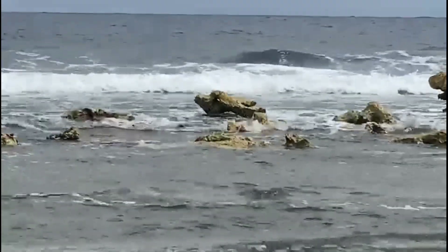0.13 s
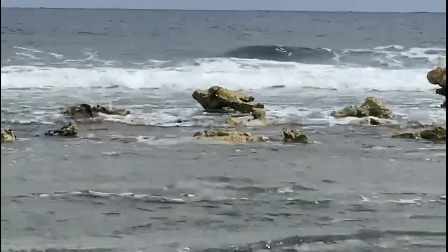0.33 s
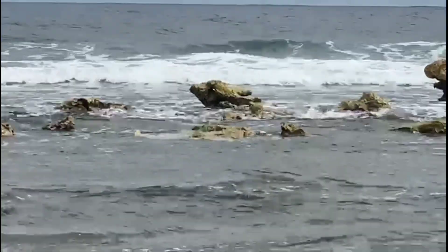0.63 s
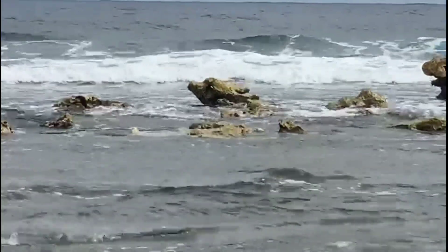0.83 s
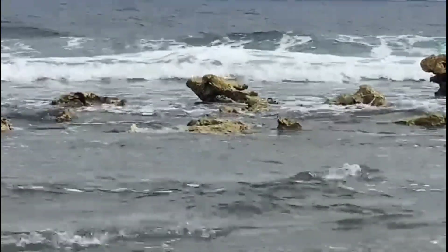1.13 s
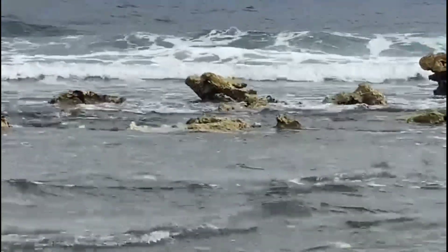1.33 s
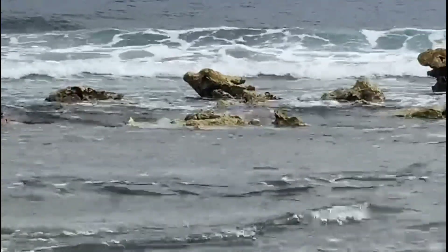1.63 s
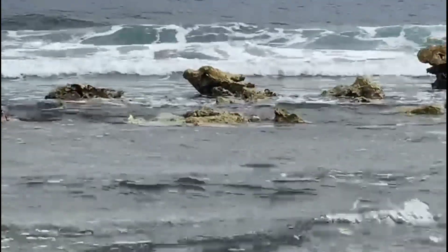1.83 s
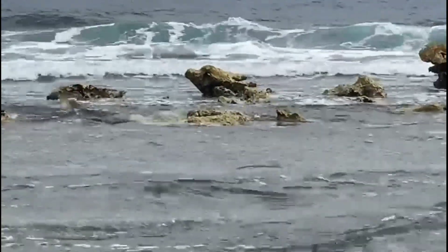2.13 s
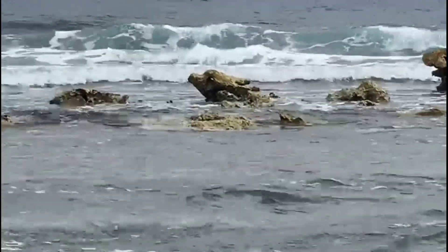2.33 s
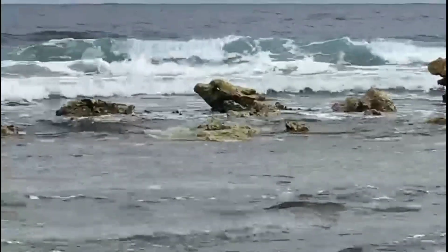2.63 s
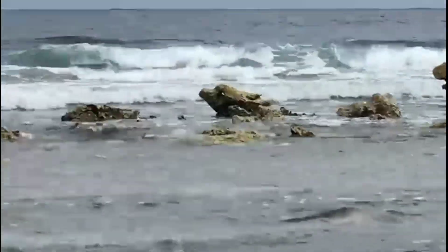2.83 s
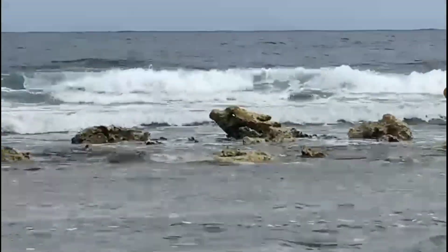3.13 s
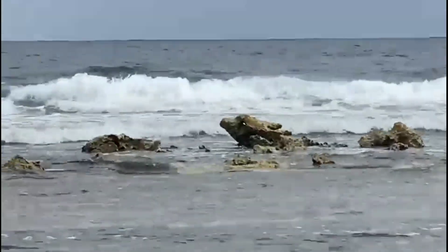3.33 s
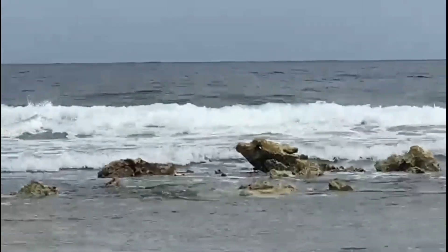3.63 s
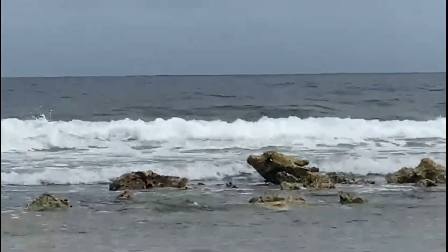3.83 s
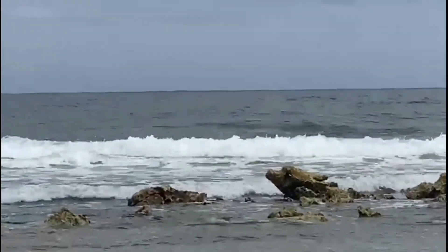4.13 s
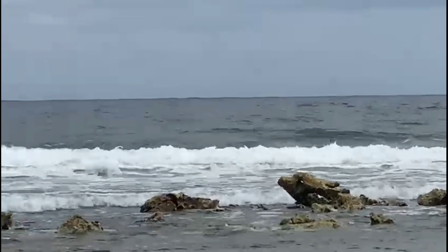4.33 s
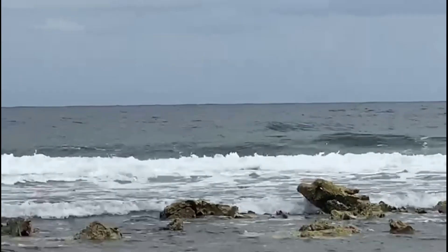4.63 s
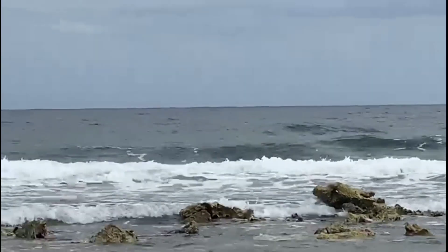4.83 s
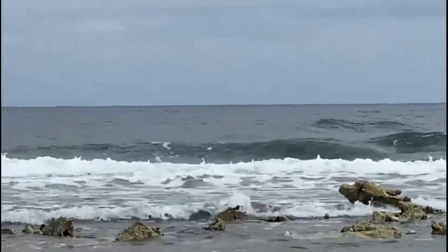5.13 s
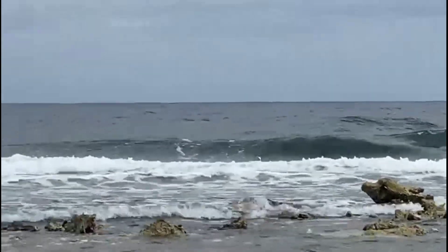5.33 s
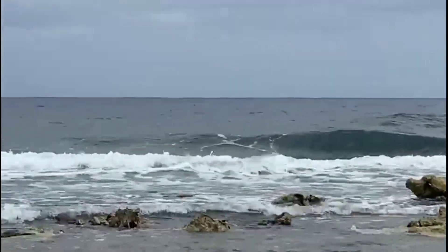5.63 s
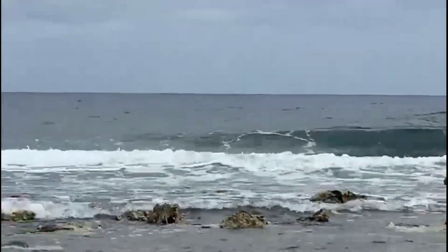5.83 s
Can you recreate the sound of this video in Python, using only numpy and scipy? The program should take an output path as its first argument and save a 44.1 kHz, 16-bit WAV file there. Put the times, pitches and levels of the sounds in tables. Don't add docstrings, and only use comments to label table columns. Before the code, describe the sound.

Sea foam hisses and fades, hard knocks thump close to the microphone, then a new wave rushes in under a rumbling breeze.

```python
import sys
import numpy as np
from scipy import signal
from scipy.io import wavfile
from scipy.ndimage import uniform_filter1d

SR = 44100
rng = np.random.default_rng(int(sys.argv[2]) if len(sys.argv) > 2 else 0)


def gain_from_db(level_db):
    decades = np.asarray(level_db, float) / 20
    return 10 ** decades


def dump(signal):
    limited = np.clip(np.atleast_2d(signal).T, -1, 1)
    pcm = np.round(limited * 32767).astype(np.int16)
    wavfile.write(sys.argv[1], SR, pcm)


N = 263718


def rms_one(x):
    return x / np.sqrt(np.mean(x ** 2) + 1e-20)


def in_time(rows):
    s, *columns = np.transpose(rows)
    return [np.interp(np.arange(N) / SR, s, c) for c in columns]


def at_hz(points, hz):
    points_hz, points_db = np.transpose(points)
    return np.interp(np.log(hz), np.log(points_hz), points_db, left=-90, right=-90)


def drift(rate):
    r = np.exp(-80 * np.pi * rate / SR)
    white = rng.standard_normal(N // 40 + 2002)
    slow = rms_one(signal.lfilter([1], [1, -2 * r, r * r], white)[2000:])
    return np.interp(np.arange(N) / 40, np.arange(len(slow)), slow)


def flicker(rate, above):
    return uniform_filter1d((drift(rate) > above) * 1.0, 256)


def swell(times, rises_db, spreads):
    t = np.arange(N) / SR
    total = 0
    for s, db, spread in zip(times, rises_db, spreads):
        total = total + db * np.exp(-0.5 * ((t - s) / max(spread, 0.004)) ** 2)
    return total


def butter(x, hz, kind, order=2):
    return signal.sosfilt(signal.butter(order, hz, kind, fs=SR, output="sos"), x)


def steep(x, hz, kind, order):
    return signal.sosfilt(signal.cheby2(order, 60, hz, kind, fs=SR, output="sos"), x)


def resonance(x, hz, width_hz):
    r = np.exp(-np.pi * width_hz / SR)
    return signal.lfilter([1, 0, -1], [1, -2 * r * np.cos(2 * np.pi * hz / SR), r * r], x)


def valleys(x):
    # pitch_hz, width_hz, depth (0-1)
    cancellations = [(384, 87, 0.45), (1000, 88, 0.36), (1506, 140, 0.63)]
    for hz, width_hz, depth in cancellations:
        gain_one = (1 - np.exp(-2 * np.pi * width_hz / SR)) / 2
        x = x - np.clip(depth, 0, 1) * gain_one * resonance(x, hz, width_hz)
    return x


def mono_edge():
    # start_s, edge_hz
    filter_edge = [(0, 210), (.48, 185), (.56, 105), (.8, 120), (.92, 284), (1.6, 560), (2.5, 830),
                   (3.1, 910), (3.8, 970), (4.1, 800), (5.0, 520), (5.4, 426), (5.98, 157)]
    return in_time(filter_edge)[0]


def rush(spectrum, level_db, lumps_db, lump_rate, patch_db, count):
    # pitch_hz, side_minus_mid_db
    port_difference = [(60, 7), (340, -2.5), (450, -9), (1000, -11), (1450, 1.5), (2100, -24.5),
                       (3000, -12), (4800, -17)]
    edge_hz = mono_edge()
    width_db = 2.1 - 4 * edge_hz / 1e3
    edges = np.geomspace(spectrum[0][0], spectrum[-1][0], count + 1)
    white, together = rng.standard_normal((2, 2, N)), drift(lump_rate)
    mid, side, power = 0, 0, 0
    for k, (low, high) in enumerate(zip(edges, edges[1:])):
        hz = np.sqrt(low * high)
        band = butter(white[k % 2], [low, high], "band")
        gain = gain_from_db(at_hz(spectrum, hz) + lumps_db * together + patch_db * drift(7.0))
        opened = gain_from_db(at_hz(port_difference, hz) + width_db) / (1 + (edge_hz / hz) ** 12)
        if hz > 2000:
            opened = opened * flicker(9.0, 1.0)
        power = power + np.mean((gain * band[0]) ** 2)
        mid = mid + gain * band[0] / np.sqrt(1 + 0.081 * opened ** 2)
        side = side + gain * butter(band[1], [low / 1.1, high * 1.1], "band") * opened
    return gain_from_db(level_db) * np.array([mid, side]) / np.sqrt(power)


def breeze():
    # start_s, level_db
    strength = [(0.04, -54), (0.3, -53), (0.75, -60), (1.3, -61.5), (2.0, -60), (2.45, -56), (2.78, -58),
                (2.95, -49.5), (3.25, -53), (3.55, -50.5), (4.0, -50.5), (4.4, -45), (4.7, -44.5),
                (5.0, -46.5), (5.3, -47.5), (5.6, -48.5), (5.98, -47)]
    # centre_s, port_rise_db, hollow_rise_db, spread_s
    gusts = [(0.1, 7, -2, 0.041), (0.41, 5.5, -0.5, 0.043), (0.52, 1, 4, 0.03), (0.6, 8, -3, 0.029),
             (0.87, 5.5, 1, 0.089), (0.99, 0, 0, 0.024), (1.1, 7, 1, 0.083), (1.25, 1, 3, 0.02),
             (1.29, 6, -5, 0.015), (1.46, 10, -2, 0.04), (1.55, 0, 3, 0.027), (1.76, 5.5, 1, 0.049),
             (2.685, 8, -8, 0.032), (2.88, 10, 11, 0.048), (3.11, 10, -2, 0.059), (3.37, 7, -1, 0.034),
             (4.07, -6, 1, 0.017), (4.531, 6, 0, 0.026), (4.565, 1, 11, 0.0062), (4.82, 1, -0.5, 0.04),
             (4.91, 4.5, -1.5, 0.035), (5.39, 1, 0, 0.027), (5.63, 12, -2, 0.016), (5.665, -7, 5.5, 0.02)]
    s, port_db, cross_db, spread = np.transpose(gusts)
    return in_time(strength)[0], swell(s, port_db, spread), swell(s, cross_db, spread)


def surf():
    # start_s, foam_level_db, breaker_weight_db
    waves = [(0.0, -43, -0.5), (0.18, -45.5, 0.5), (0.6, -48.5, -0.5), (1.2, -52.5, -0.5), (1.75, -56.5, 1),
             (2.45, -55.5, 2.5), (2.72, -50, 0.5), (2.9, -45.5, 1.5), (3.04, -42, 1), (3.2, -41, 0),
             (3.8, -40.5, -3), (3.9, -42, -3.5), (4.28, -42.5, 0.5), (4.5, -43, 2.5), (5.0, -43.5, -1.5),
             (5.35, -43.5, -2), (5.98, -47.5, 1)]
    # centre_s, rise_db, spread_s
    slaps = [
        (2.56, 2, 0.028),
        (2.627, 10.5, 0.0074),
        (2.65, 9, 0.01),
        (2.81, 2.5, 0.021),
        (2.96, 2, 0.02),
        (3.55, 0.5, 0.07),
    ]
    foam_db, weight_db = in_time(waves)
    return foam_db, weight_db, swell(*np.transpose(slaps)), foam_db + 48


def moan():
    # start_s, pitch_hz, level_db
    tone = [
        (1.42, 212, -60),
        (1.62, 232, -63),
        (1.83, 284, -58),
        (2.06, 284, -54),
        (2.29, 305, -57.5),
        (2.75, 302, -57.5),
        (3.15, 267, -56.5),
        (3.4, 247, -52),
        (3.62, 225, -56),
    ]
    hz, db = in_time(tone)
    t = np.arange(N) / SR
    turns = np.cumsum(hz * (1 + 0.0072 * drift(4.6))) / SR
    on = (t > tone[0][0]) & (t < tone[-1][0])
    return np.sqrt(2) * on * gain_from_db(db + 2.0 * drift(14.0)) * np.sin(2 * np.pi * turns)


def rumble():
    # pitch_hz, level_db (per Hz)
    rumble_spectrum = [(22, -30), (35, -23), (50, -1.5), (70, 1), (100, -6), (150, -9)]
    wind_db, gust_db, _ = breeze()
    return rush(rumble_spectrum, wind_db + gust_db, 0.33, 18.0, 0.99, count=6)


def buffeting():
    # pitch_hz, level_db (per Hz)
    buffet_spectrum = [(130, -6), (170, -3), (260, -5.5), (340, -2), (420, -14.5)]
    wind_db, gust_db, _ = breeze()
    lull_db = 8.0 / (1 + (mono_edge() / 150) ** 8)
    level_db = -52.5 + 0.56 * (wind_db - wind_db.mean()) + 0.33 * gust_db - lull_db
    return rush(buffet_spectrum, level_db, 0.78, 36.0, 1.57, count=4)


def hollow():
    # pitch_hz, level_db (per Hz)
    hollow_spectrum = [(400, -21), (450, -5.5), (520, -1), (600, 0.5), (700, -1), (800, -9), (900, -9)]
    # start_s, level_db
    facing = [(0.0, -42), (0.2, -45.5), (1.0, -46.5), (1.8, -45), (2.3, -46), (2.52, -40.5), (2.7, -45),
              (2.8, -49.5), (3.05, -50), (3.4, -48), (4.0, -49), (4.35, -51), (4.9, -45.5), (5.3, -51),
              (5.55, -43), (5.98, -43.5)]
    return rush(hollow_spectrum, in_time(facing)[0] + breeze()[2], 1.8, 46.0, 1.4, count=7)


def shoves():
    # start_s, level_db, pitch_hz
    pushes = [
        (2.662, -31.5, 46),
        (4.05, -45, 62),
        (4.42, -43, 45),
        (3.24, -48, 45),
    ]
    out, t = np.zeros(N), np.arange(SR // 10) / SR
    fade = np.hanning(2 * len(t))[len(t):]
    for s, db, hz in pushes:
        push = t / 0.013 * np.exp(1 - t / 0.017) * np.sin(2 * np.pi * hz * t)
        out[round(s * SR):][:len(t)] += gain_from_db(db) * push * fade
    return out


def ticks():
    # start_s, level_db, pitch_hz
    tick_events = [(1.502, -54, 4770), (2.631, -38, 6740), (2.6305, -46, 9900), (2.6372, -35, 950),
                   (2.8205, -34, 955), (2.9567, -43, 9200), (3.55, -44, 7000), (4.098, -43, 5200),
                   (4.105, -43, 5160), (4.269, -41, 4140), (4.283, -49, 6000)]
    out, size = np.zeros(N), round(0.0028 * SR)
    for (s, db, hz), noise in zip(tick_events, rng.standard_normal((len(tick_events), size))):
        burst = np.r_[rms_one(noise * np.hanning(size)), np.zeros(size)]
        burst = rms_one(butter(burst, [hz / 1.17, hz * 1.19], "band", order=3))
        out[round(s * SR):][:2 * size] += gain_from_db(db) * burst
    off_centre = np.abs(np.arange(N) / SR - tick_events[1][0]) < 0.02
    return np.array([out, 0.31 * out * off_centre])


def knocks():
    # start_s, shell_db, thud_db, low_ring_db, shell_pitch_hz
    blows = [
        (2.5561, -9.5, -13, -24, 532),
        (2.6368, -11.5, -20, -47, 498),
        (2.8192, -2, -12, -25, 483),
        (4.1165, -17.5, -23, -32.5, 563),
        (4.144, -20, -24, -29, 560),
        (4.2126, -20.5, -28, -38, 564),
        (4.279, -16, -21, -25.5, 560),
        (1.333, -38, -40, -53, 510),
        (2.078, -39, -39.5, -50, 500),
    ]
    thud_lag_s, ring_lag_s = 0.00198, 0.0028
    out, size = np.zeros((2, N)), SR // 8
    blow = np.zeros(size) + 1e-18
    blow[0] = 1
    crack = 0
    for hz, share in ((1000, 0.79), (1480, 1.2), (1900, 1.1)):
        crack = crack + share * resonance(resonance(blow, hz, 170), hz, 170)
    thud = butter(butter(blow, 380, "low", order=4), 106, "high")
    pole = np.exp(-2 * np.pi * 96.5 / SR)
    allpass = [pole ** 2, -2 * pole, 1, 1, -2 * pole, pole ** 2]
    thud = signal.sosfilt([allpass] * 2, thud)
    ring = resonance(butter(blow, 105, "low", order=4), 71, 22)
    crack, thud, ring = (v / np.max(np.abs(v)) for v in (crack, thud, ring))
    for s, db, thud_db, ring_db, hz in blows:
        width_hz = max(296 + 5.5 * db, 150)
        crack_db = db - 21.0
        shell = butter(butter(blow, 1020, "low", order=4), 416, "high", order=6)
        for _ in range(3):
            shell = resonance(shell, hz, width_hz)
        shell = shell / np.max(np.abs(shell))
        shell_side = butter(shell, 890, "high", order=4)
        start = round(s * SR)
        out[0, start:][:size] += gain_from_db(db) * shell + gain_from_db(crack_db) * crack
        out[1, start:][:size] += gain_from_db(db - 13.0) * shell_side + gain_from_db(crack_db - 0.5) * crack
        out[0, round((s + thud_lag_s) * SR):][:size] += gain_from_db(thud_db) * thud
        out[0, round((s + ring_lag_s) * SR):][:size] += gain_from_db(ring_db) * ring
    return out


def spray():
    # pitch_hz, level_db (per Hz)
    spray_spectrum = [(7700, -44), (8050, 1.5), (8800, -7), (9600, 1.5), (10400, -30), (11000, 15),
                      (11300, -8)]
    _, _, splash_db, swing = surf()
    return rush(spray_spectrum, -48.5 + 0.13 * swing + 0.1 * splash_db, 0.75, 6.4, 1.0, count=6)


def crackle():
    sizes = gain_from_db(4.0 * np.minimum(rng.exponential(1, N), 4)) * rng.choice([-1, 1], N)
    born = rng.random(N) < 400 * gain_from_db(3.0 * drift(12.0)) / SR
    pops = rms_one(butter(sizes * born + 1e-18, [2100, 6500], "band"))
    return gain_from_db(surf()[0] - 11.0) * pops


def fizz():
    # pitch_hz, level_db (per Hz)
    fizz_spectrum = [(3900, 6), (4400, 0.5), (5500, 0.5), (6700, -0.5), (7600, -4), (8300, -10)]
    _, _, splash_db, swing = surf()
    return rush(fizz_spectrum, -53 + 1.056 * swing + 0.83 * splash_db, 0.51, 42.0, 0.64, count=4)


def breakers():
    # pitch_hz, level_db (per Hz)
    body_spectrum = [(700, -4), (850, 1), (950, 2), (1050, -3.5), (1250, 0), (1450, -8), (1600, -8)]
    _, weight_db, splash_db, swing = surf()
    return rush(body_spectrum, -47.5 + 0.67 * (swing + splash_db) + weight_db, 0.98, 26.0, 0.6, count=7)


def foam():
    # pitch_hz, level_db (per Hz)
    foam_spectrum = [(1480, -12), (1650, 4.5), (1800, 1), (2000, 0), (2250, 0.5), (2650, -3.5), (3500, -6),
                     (4300, -15)]
    foam_db, _, splash_db, _ = surf()
    return rush(foam_spectrum, foam_db + splash_db + 2.0, 0.43, 22.0, 0.99, count=8)


def scene():
    wind = rumble() + buffeting() + hollow()
    sea = spray() + fizz() + breakers() + foam()
    mid, side = valleys(wind + sea) + knocks() + ticks()
    mid = mid + moan() + shoves() + crackle()
    return np.array([mid + side, mid - side])


def top_cut(x):
    return signal.sosfilt(signal.butter(12, 11620, fs=SR, output="sos"), x)


def record(dry):
    # side opens, mid closes (rim from, to), mid reopens (rim from, to), side closes [Hz]
    seam_hz = (7650, 8290, 8400, 8720, 8860, 9550)
    # dull_hz, full_hz
    top_edge_hz = (10980, 11170)
    dry = 1.4 * np.tanh(dry / 1.4)
    mid, side = (dry[0] + dry[1]) / 2, (dry[0] - dry[1]) / 2
    side = side + gain_from_db(0.5) * steep(mid, [seam_hz[0] - 250, seam_hz[5] + 250], "bandpass", order=8)
    mid = steep(mid, seam_hz[2:4], "bandstop", order=8)
    rim_mark = (-48 - surf()[0]) / 7
    for low, high in (seam_hz[1:3], seam_hz[3:5]):
        without_rim = steep(mid, [low - 30, high + 30], "bandstop", order=4)
        mid = mid + flicker(9.0, rim_mark) * (without_rim - mid)
    dull, full = (steep(mid, hz, "low", order=16) for hz in top_edge_hz)
    mid = dull + flicker(12.0, 0.47 * rim_mark - 0.33) * (full - dull)
    side = steep(side, top_edge_hz[1], "low", order=16)
    return top_cut(np.array([mid + side, mid - side]))


dry = scene()
out = record(dry)
dump(out)
```